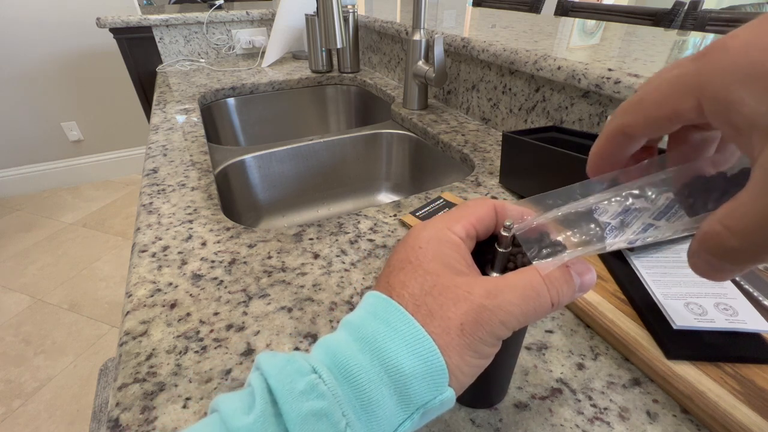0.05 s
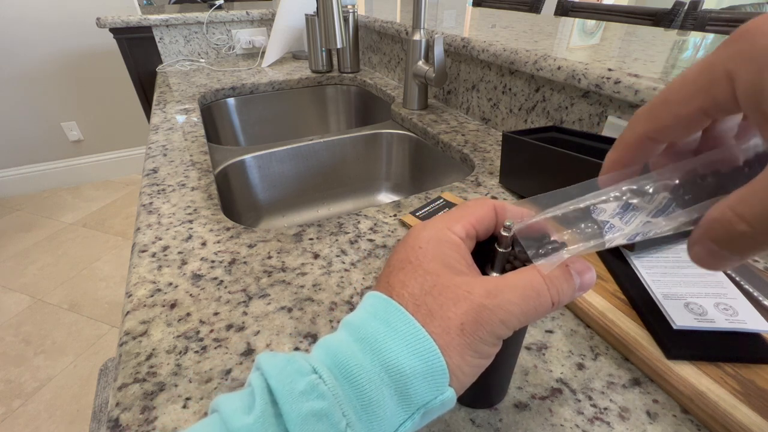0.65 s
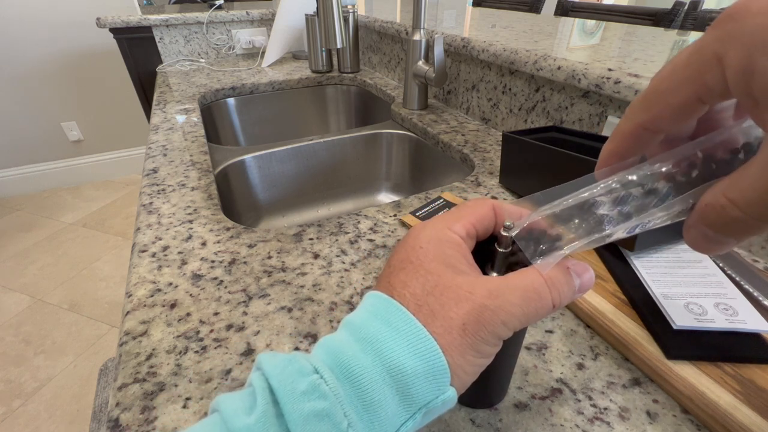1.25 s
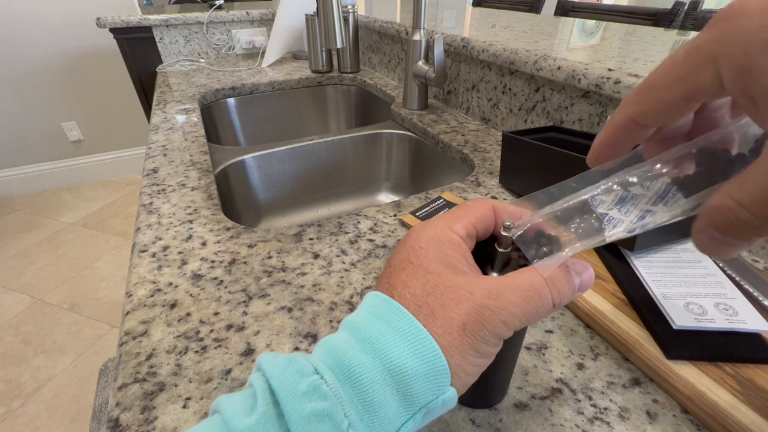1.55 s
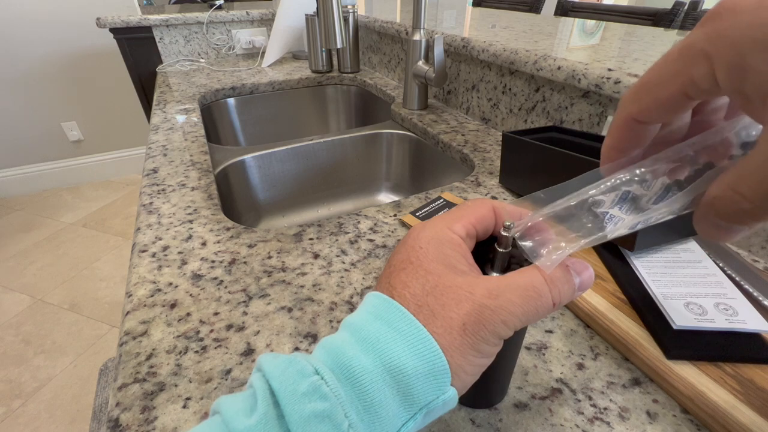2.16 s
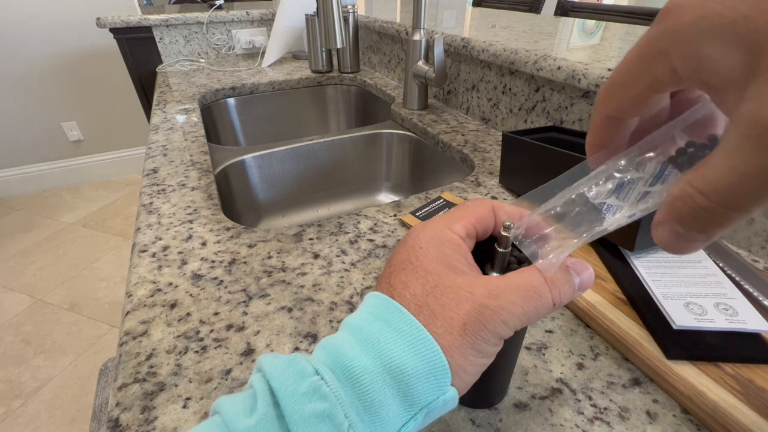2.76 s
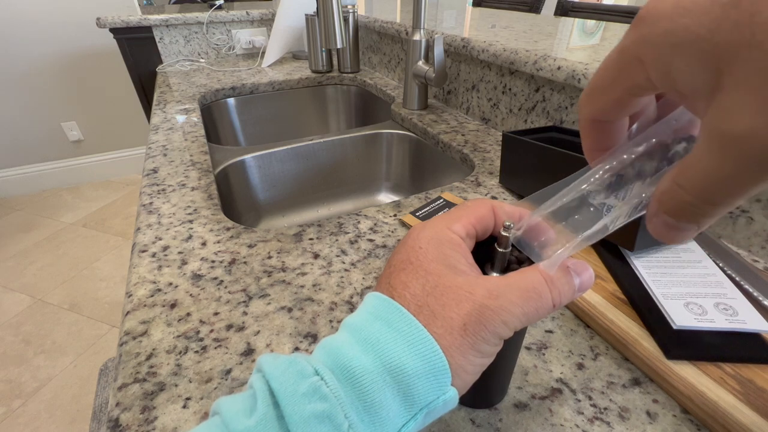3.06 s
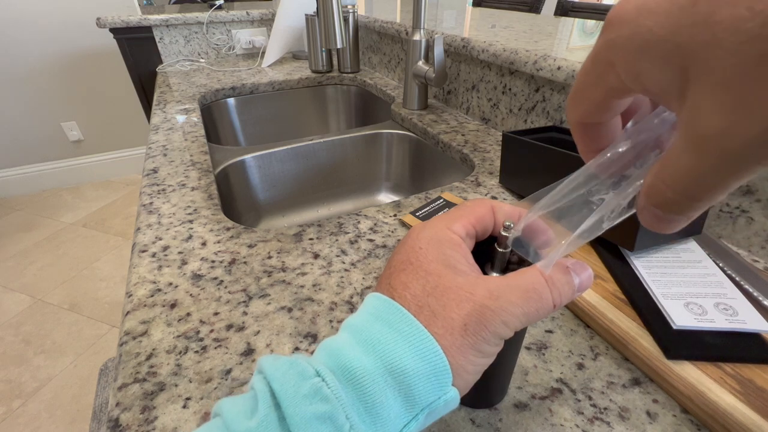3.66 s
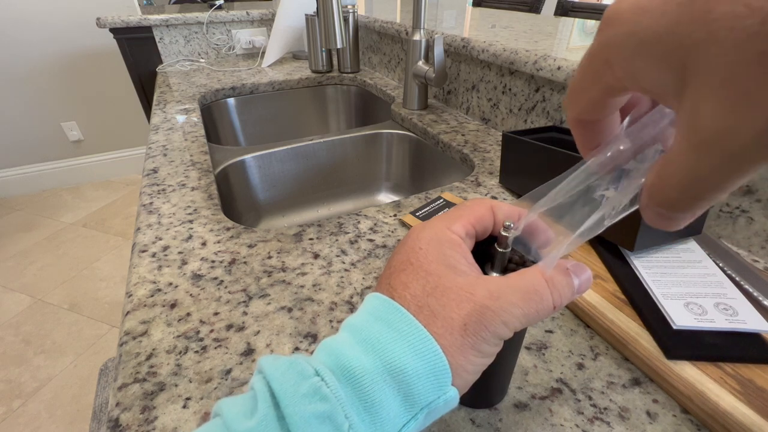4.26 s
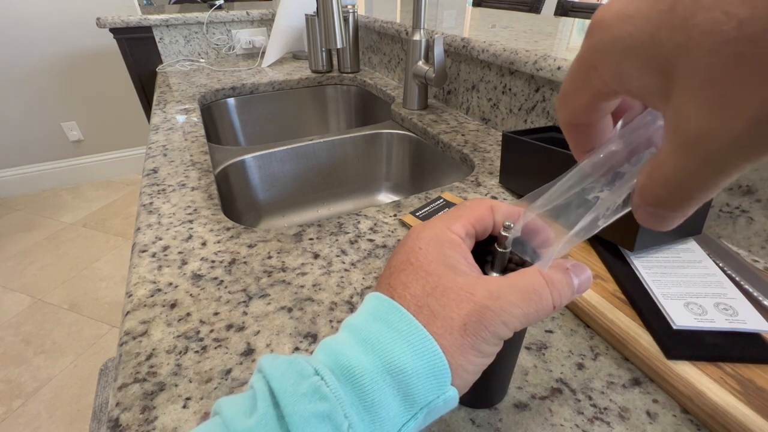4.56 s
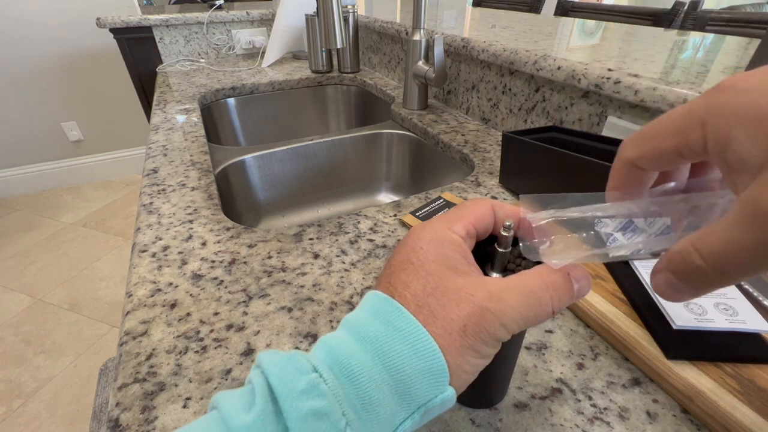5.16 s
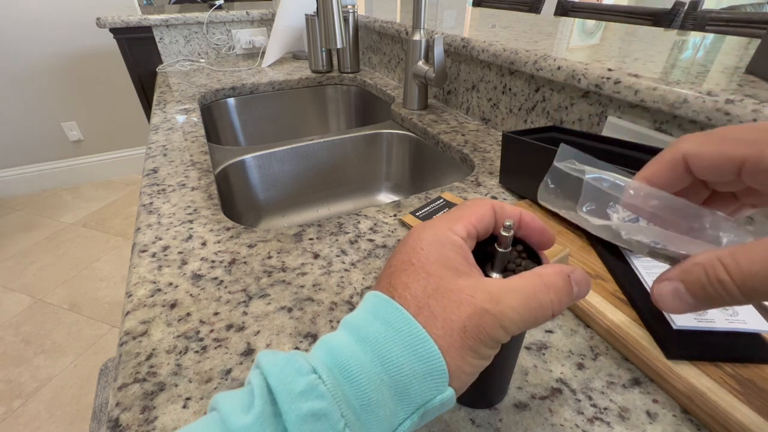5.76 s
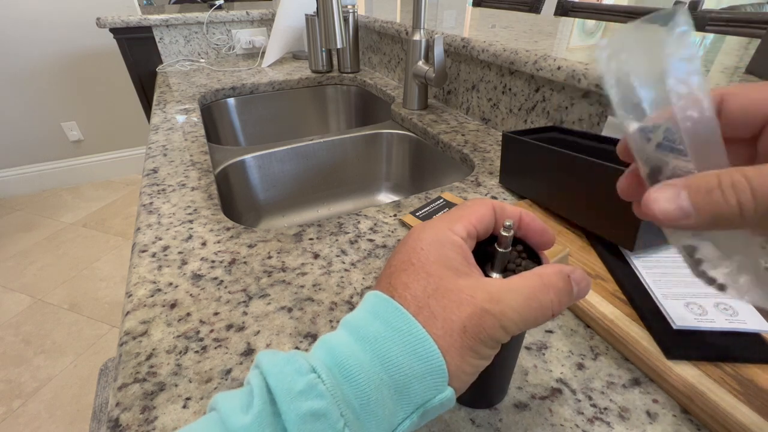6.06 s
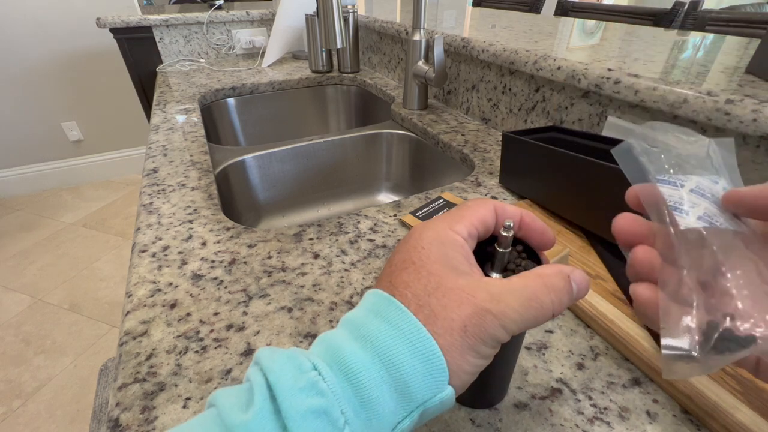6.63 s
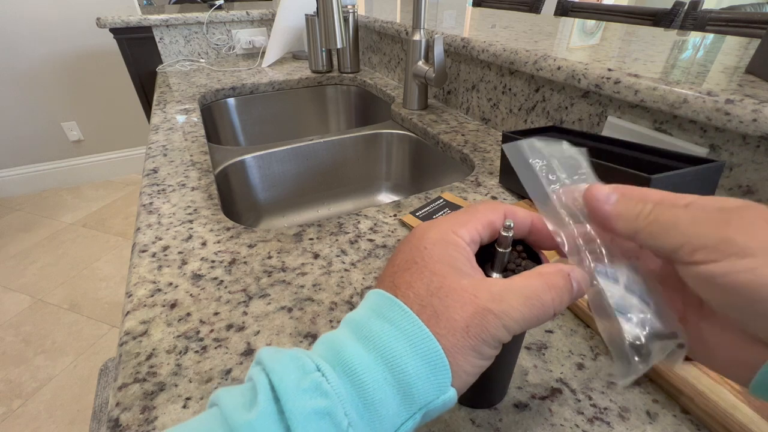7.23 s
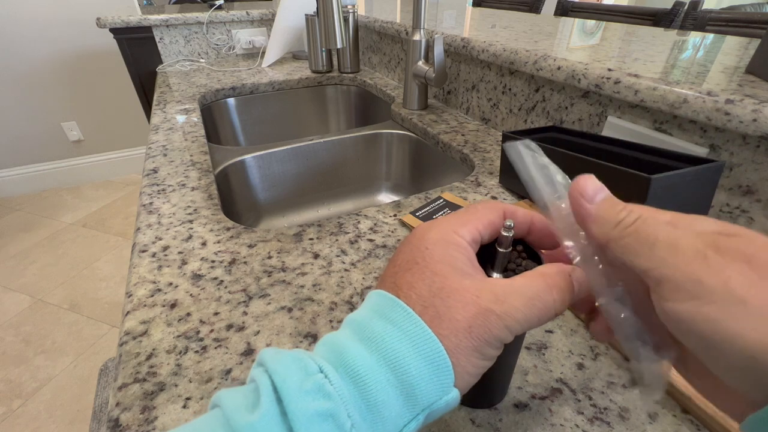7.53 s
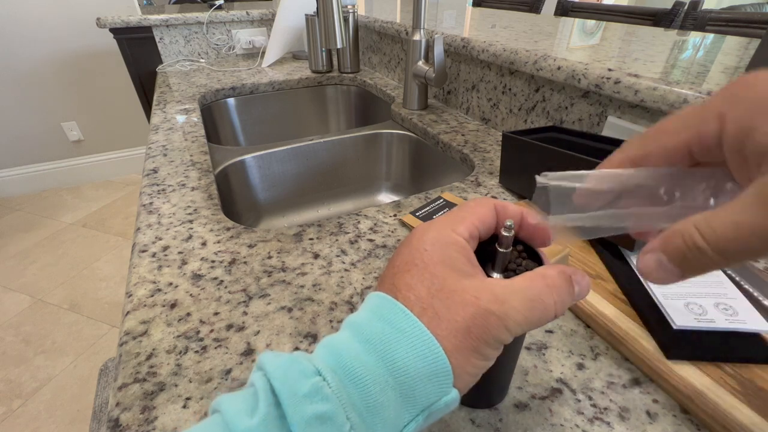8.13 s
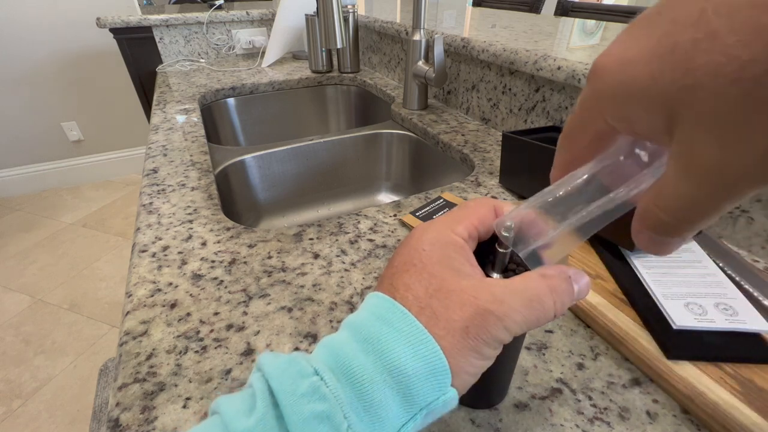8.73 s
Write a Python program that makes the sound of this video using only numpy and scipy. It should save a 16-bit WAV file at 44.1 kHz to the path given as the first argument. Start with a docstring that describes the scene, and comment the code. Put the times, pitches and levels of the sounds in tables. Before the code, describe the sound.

A thin plastic packet crinkles close by, with a sharp snap at about 0.3 seconds. From around 1 second, peppercorns slide out in small spurts, ticking against the plastic and landing in a metal grinder with a faint, low ring. Creases crack loudly near 1.8 seconds, and the shaking, trickling and crackling go on until about 5 seconds, with soft, dull bumps from the fingers. After a short lull, the packet is tipped back and the remaining corns rattle down inside it near 5.8 seconds with a hollow sound. From 6.3 to 7.7 seconds it is handled more busily, with snaps, rattles and small thumps. One more sharp crack and bump comes just after 8 seconds, followed by a short final pour around 8.5 seconds. The kitchen adds a soft echo over a very faint, low hush.

```python
"""A thin plastic packet crackles and snaps as fingers shake peppercorns out into a steel grinder.
The corns tick against the plastic as they slide and ring the grinder's cup as they land.
Creases flip with sharp cracks, and the hand adds dull bumps. The packet is tipped back, the last
corns rattle down inside its hollow, and it is poured again. A hard kitchen echoes softly."""
import sys
import numpy as np
from scipy import signal
from scipy.fft import rfft, irfft, next_fast_len
from scipy.io import wavfile
from scipy.ndimage import uniform_filter1d, map_coordinates

SR = 44100
rng = np.random.default_rng(int(sys.argv[2]) if len(sys.argv) > 2 else 0)


def generate_wav(signal):
    """Clip the signal to [-1, 1] and save it as 16-bit WAV at the path in sys.argv[1]."""
    frames = np.transpose(np.atleast_2d(signal))
    scaled = np.clip(frames, -1, 1) * 32767
    pcm = np.round(scaled).astype(np.int16)
    wavfile.write(sys.argv[1], SR, pcm)


N = 387638

# Tone colours: how strong each pitch is in a sound. Columns: pitch_hz, level_db
POURING_TONE = [(300, -40.5), (520, -22), (680, -4), (870, -0.5), (1080, 1), (1400, -6.5), (2200, -5),
                (3400, -16.5), (9500, -28), (12000, -20.5), (16000, -44)]  # corns running out
HOLLOW_TONE = [(700, -30), (1200, -9), (1400, -1.5), (1760, -1), (2000, -16), (2300, -11.5), (3200, -19.5),
               (6500, -27.5), (14000, -38)]  # corns falling back inside
PLASTIC_TONE = [(1500, 4.5), (4000, 4), (6500, 6), (12000, 0.5), (15500, -11.5)]  # plastic rustling and cracking
FLICK_TONE = [(2500, -26.5), (7000, 1), (9500, 4), (16000, -4.5)]  # a small crease flipping
BUMP_TONE = [(30, -51), (80, -2), (330, 2), (700, -3), (1200, -27)]  # the hand bumping the packet


def corns(rattle_db, landing_db, tilt):
    """Corns tick on the plastic, broad running out, hollow falling back; they ring the cup as they land."""
    full_flow_db, cup_db, clump_db = -43, -5, 4
    stream = np.minimum(amp(landing_db - full_flow_db), 1)
    ticks = patter(380, 5.5, .0005)
    rush = (.2 + .7 * stream ** 2) * stereo_noise(.6, N)  # in a full stream the ticks merge
    pouring = np.sqrt(tilt) * steady(coloured(ticks + rush, POURING_TONE), seconds=0.1)
    # the hollow's note rises as corns fill the closed end, and wavers as the walls flex
    fill = np.interp(np.arange(N) / SR, (5.77, 6.13), (0, 1))
    fill = np.clip(fill + 0.24 * wobble(12), 0, 1)
    tumble = lambda: patter(800, 5, .0005)
    empty = coloured(tumble(), [(hz * 0.967, db) for hz, db in HOLLOW_TONE])
    full = coloured(tumble(), [(hz * 1.016, db) for hz, db in HOLLOW_TONE])
    hollow = np.sqrt(1 - tilt) * steady(np.sqrt(1 - fill) * empty + np.sqrt(fill) * full, seconds=0.095)
    # The ring of the grinder's cup. Columns: pitch_hz, level_db
    cup_tone = [(190, -25), (370, 7), (510, -9), (900, -28.5)]
    cup = amp(full_flow_db + cup_db) * stream ** 2 * unit(coloured(tumble(), cup_tone))
    clumps = (1 - stream / 2) * wobble(28)  # corns jam and let go in small groups
    return amp(clump_db * clumps) * (amp(rattle_db) * (pouring + hollow) + cup)


def snaps(tilt, size=2048):
    """A big crease cracks and rings the plastic, a single corn knocks on it, a small crease only ticks."""
    # Big creases buckling. Columns: start_s, level_db, pitch_hz, crack_db (all levels are relative)
    buckles = [(0.221, -21, 1500, -33), (0.296, -11, 1524, -21), (0.529, -19, 1545, -28),
               (0.94, -39, 1240, -1), (1.232, -28.5, 1270, -5.5), (1.733, -17, 1415, -20),
               (1.788, -11, 1526, -10.5), (1.798, -16.5, 1310, -32), (2.531, -24.5, 1290, -31),
               (2.695, -24.5, 2160, -16), (2.964, -19, 1405, -29), (3.288, -24, 1940, -14.5),
               (3.519, -20, 2270, -25.5), (3.824, -21.5, 1980, -22.5), (3.849, -21, 1740, -17),
               (3.891, -20.5, 1240, -33), (4.031, -20.5, 1380, -10.5), (4.821, -28, 2180, -11.5),
               (4.901, -17.5, 1110, -28), (6.272, -21.5, 1573, -23), (6.352, -20.5, 1580, -23),
               (6.415, -14, 1490, -21), (6.575, -22.5, 1450, -18), (6.706, -20, 1600, -23.5),
               (6.841, -18.5, 1520, -14.5), (6.936, -22, 865, -18.5), (6.974, -21, 1890, -10),
               (7.019, -17, 1570, -30), (7.136, -13.5, 1490, -34), (7.242, -21.5, 1545, -16.5),
               (7.348, -14.5, 2076, -23), (7.846, -23, 1635, -20.5), (7.94, -28, 1506, -33),
               (8.064, -11, 1518, -14)]
    # Single corns hitting the tight packet. Columns: start_s, level_db
    taps = [(0.028, -23.5), (0.115, -27.5), (0.17, -27), (0.4, -27), (1.184, -19), (1.295, -22),
            (1.337, -22.5), (1.384, -24), (1.507, -22.5), (1.743, -16), (1.999, -24), (2.085, -29),
            (2.224, -27), (2.252, -25.5), (2.331, -34.5), (2.458, -28.5), (2.856, -22.5), (3.023, -27),
            (3.182, -20), (3.231, -25.5), (3.353, -36), (3.586, -28.5), (3.756, -27), (3.929, -20),
            (4.045, -23), (4.26, -31.5), (4.325, -30), (4.366, -24.5), (4.479, -42.5), (4.763, -37.5),
            (4.873, -26.5), (5.15, -42), (5.485, -41), (5.838, -27), (5.902, -23.5), (6.152, -22),
            (6.378, -18), (6.475, -20.5), (6.524, -18.5), (6.626, -28.5), (7.093, -18.5), (7.523, -23),
            (7.573, -28.5), (7.619, -24.5), (7.702, -25.5), (8.221, -34.5)]
    # Small creases flipping. Columns: start_s, level_db
    flicks = [(2.163, -27.5), (2.507, -28), (2.597, -24.5), (3.034, -30), (3.945, -28), (3.976, -33),
              (4.007, -23), (4.121, -25.5), (4.594, -42), (4.951, -27), (5.065, -34.5), (8.587, -29.5),
              (8.687, -29)]
    # The notes in a buckling patch of plastic. Columns: pitch_ratio, level_db
    notes = [(.71, -9), (1, 8), (1.44, -3), (3.2, -16.5)]
    lead = SR // 100  # samples of room for each sound to build up
    out = np.zeros((2, N + size))
    t = (np.arange(size) - lead) / SR - .001

    def burst(fade_s):
        """A puff of noise that rises fast, then drops 60 dB in fade_s."""
        return stereo_noise(.75, size) * amp(-60 * np.maximum(t / fade_s, -t / .003))

    def ring(hz):
        """The plastic's short hollow note, roughened with noise."""
        age = np.maximum(t, 0)
        waves = sum(amp(db + 2 * rng.standard_normal((2, 1))) * np.sin(2 * np.pi * hz * ratio * age)
                    for ratio, db in notes)
        noise = coloured(burst(0.011), [(hz / 5, -20), (hz / 2, -4), (hz * 1.5, -2), (hz * 8, -34)])
        return unit(unit(waves * amp(-60 * age / 0.037)) + unit(noise))

    def add(start_s, db, sound):
        """Place one sound in the mix."""
        out[:, round(start_s * SR) - lead:][:, :size] += amp(db - 22.5) * sound

    for start_s, db, hz, crack_db in buckles:
        cutoff_hz = 6500 * 2 ** (-(db + 11.5) / 10)  # bigger creases flip more slowly and sound duller
        crack = coloured(burst(.009), PLASTIC_TONE)
        crack = unit(coloured(crack, [(cutoff_hz, 0), (2 * cutoff_hz, -14)]))
        add(start_s, db, ring(hz) + amp(crack_db + 10.0) * crack)
        add(start_s + rng.uniform(0.00298, .012), db - 13, ring(hz))  # it settles with a smaller flip
    for start_s, db in taps:
        knock, down = burst(0.018), tilt[round(start_s * SR)]
        tap = down * coloured(knock, POURING_TONE) + (1 - down) * coloured(knock, HOLLOW_TONE)
        add(start_s, db, unit(tap))
    for start_s, db in flicks:
        add(start_s, db, unit(coloured(burst(0.013), FLICK_TONE)))
    return out[:, :N]


def crackle(flick_db, rustle_db):
    """Creases flip with thin, scattered ticks over a fine sliding rustle."""
    flicks = steady(coloured(patter(70, 5.4, .0006), FLICK_TONE), seconds=0.95)
    rustle = steady(coloured(patter(1500, 4, .0006), PLASTIC_TONE), seconds=0.094)
    return amp(flick_db - 1.5) * flicks + amp(rustle_db - 6.5) * rustle


def handling(tilt):
    """Slides and squeezes set how loud the rattle, crease flicks, bumps and landing corns are, in dB."""
    # Corns sliding along the packet. Columns: start_s, hold_s, level_db
    slides = [(1.08, 0.37, -42), (1.86, 0.25, -45), (2.3, 0.092, -48), (2.99, 0.4, -47.5),
              (3.21, 0.058, -46.5), (3.88, 0.032, -44.5), (5.83, 0.1, -42), (6.58, 0.24, -43.5),
              (8.3, 0.19, -43.5)]
    # Fingers jostling the corns. Columns: start_s, hold_s, level_db, bump_db (added to level_db)
    squeezes = [(0.0, 0.22, -49, -15), (0.257, 0.18, -53, -6.5), (0.535, 0.092, -56.5, -10),
                (1.72, 0.1, -49, -12), (1.967, 0.17, -47, -7), (2.214, 0.39, -50.5, -9),
                (2.684, 0.13, -48.5, -7), (3.165, 0.23, -51.5, -8), (3.518, 0.12, -59.5, 0.5),
                (3.69, 0.087, -49.5, -6), (3.917, 0.021, -41, -37), (4.123, 0.13, -58, -4),
                (4.339, 0.033, -53, 0.5), (4.474, 0.18, -59, -1), (4.875, 0.094, -50, -8),
                (6.128, 0.0048, -39, -46), (6.375, 0.11, -38, -12.5), (6.683, 0.24, -56, 1),
                (6.956, 0.068, -37, -11.5), (7.11, 0.011, -41, -5), (7.249, 0.055, -36, -7.5),
                (7.385, 0.12, -44.5, -9.5), (7.587, 0.0063, -44, 1), (7.821, 0.07, -52, -1.5),
                (8.445, 0.16, -50, 1.5)]
    trickle = (amp(-63) * tilt) ** 2  # stray corns creep while the mouth points down
    flow = swells(slides, rise_db_per_s=80.5, fall_db_per_s=72.5) + trickle
    speeds = dict(rise_db_per_s=488.5, fall_db_per_s=183)  # plastic gives at once, relaxes more slowly
    jostle = swells([row[:3] for row in squeezes], **speeds)
    bumps = swells([(start_s, hold_s, db + bump) for start_s, hold_s, db, bump in squeezes], **speeds)
    # sliding corns also flip creases and bump softly against the fingers
    flick_db = decibels(jostle + amp(-7) ** 2 * flow)
    bump_db = decibels(bumps + amp(-25.5) ** 2 * flow)
    return decibels(flow + jostle), flick_db, bump_db, decibels(flow * tilt ** 3)


def fingers(bump_db):
    """Fingertips bump and drag on the packet."""
    return amp(bump_db) * steady(coloured(patter(300, 4, .003), BUMP_TONE), seconds=0.041)


def thumps(size=4096):
    """The hand catches the bigger jolts with short, dull thumps."""
    # The packet hitting the hand. Columns: start_s, level_db (relative)
    jolts = [(0.303, -43.5), (1.786, -34), (2.854, -33), (6.414, -37.5), (6.705, -35), (6.935, -32.5),
             (7.017, -31.5), (7.24, -37), (7.348, -37), (7.576, -34), (8.065, -26.5)]
    out, t = np.zeros((2, N + size)), np.arange(size) / SR
    for start_s, db in jolts:
        push = coloured(stereo_noise(0.53, size) * amp(-60 * t / 0.061), BUMP_TONE)
        out[:, round(start_s * SR):][:, :size] += amp(db - 16.5) * unit(push)
    return out[:, :N]


def kitchen(x, counter_db, room_db, size=16384):
    """Counter and sink echo quickly, the room adds a soft tail; both shift randomly over time."""
    # How long the room's echo takes to drop 60 dB. Columns: pitch_hz, fade_s
    fades = [(150, 1), (1000, 0.63), (7000, 0.88), (15000, 0.012)]
    age = np.arange(size) / SR
    padded = np.pad(x, ((0, 0), (size // 2, 2 * size)))
    out = padded.copy()
    for start in range(0, N + size // 2, size // 2):  # each overlapping piece gets a new random echo
        hz, t, spectrum = signal.stft(rng.standard_normal((2, size)), SR, nperseg=256)
        tail = signal.istft(spectrum * amp(-60 * t / at_pitch(fades, hz)[:, None]), SR, nperseg=256)[1]
        early = rng.standard_normal((2, size)) * amp(-60 * age / .03)
        echo = (amp(room_db) * unit(tail) + amp(counter_db) * unit(early)) / np.sqrt(size)
        piece = padded[:, start:start + size] * np.hanning(size)
        out[:, start:start + 2 * size - 1] += signal.fftconvolve(piece, echo, axes=1)
    return out[:, size // 2:][:, :N]


def room_air():
    """The air in the room makes a faint, low hush."""
    # The tone of the hush. Columns: pitch_hz, level_db
    air_tone = [(25, -28.5), (120, 0), (200, -9.5), (2000, -24), (16000, -42)]
    return amp(-71.5) * unit(coloured(stereo_noise(1.0, N), air_tone))


def amp(db):
    """Turn decibels into a multiplier."""
    return 10 ** (np.asarray(db) / 20)


def decibels(power):
    """Turn power into decibels."""
    return 10 * np.log10(power + 1e-20)


def unit(x):
    """Scale a sound to an average power of 1."""
    return x / np.sqrt(np.mean(x ** 2) + 1e-20)


def steady(x, seconds):
    """Even out loudness changes slower than the given time."""
    power = uniform_filter1d(np.mean(x ** 2, axis=0), max(int(seconds * SR), 2))
    return x / np.sqrt(np.abs(power) + np.mean(x ** 2) / 100)


def at_pitch(points, hz):
    """Read between (pitch_hz, value) rows, with octaves evenly spaced."""
    pitches, values = np.transpose(points)
    return np.interp(np.log(hz + 1), np.log(pitches + 1), values)


def coloured(x, tone):
    """Filter a sound with a tone colour of (pitch_hz, level_db) rows."""
    n = x.shape[-1]
    size = 2 * next_fast_len(n // 2 + 1024)
    gain = amp(at_pitch(tone, np.fft.rfftfreq(size, 1 / SR)))
    shape = irfft(np.log(gain), size)
    shape[1:size // 2] *= 2  # fold it so the filter rings after a hit, never before
    shape[size // 2 + 1:] = 0
    return irfft(rfft(x, size) * np.exp(rfft(shape)), size)[..., :n]


def stereo_noise(alike, size):
    """Left and right hiss: unrelated when alike is 0, the same when it is 1."""
    mid, side = rng.standard_normal((2, size))
    turn = np.arccos(np.clip(alike, -1, 1)) / 2
    return np.cos(turn) * mid + np.sin(turn) * np.array([side, -side])


def patter(per_s, scatter_db, fade_s):
    """A shower of tiny dry ticks, each a puff of noise with its own strength."""
    hits = (rng.random(N) < per_s / SR) * amp(scatter_db * np.clip(rng.standard_normal(N), -2, 2))
    power = signal.lfilter([1], [1, -np.exp(-2 / (fade_s * SR))], hits ** 2)
    return unit(np.sqrt(power) * stereo_noise(0.45, N))


def wobble(per_s):
    """A smooth curve through per_s random points a second."""
    return map_coordinates(rng.standard_normal(N), [np.arange(N) * per_s / SR])


def swells(rows, rise_db_per_s, fall_db_per_s):
    """Total power of moves that reach their level at start_s, hold it and fade."""
    t, power = np.arange(N) / SR, np.zeros(N)
    for start_s, hold_s, db in rows:
        drop_db = np.maximum(rise_db_per_s * (start_s - t), fall_db_per_s * (t - start_s - hold_s))
        power += amp(db - np.clip(drop_db, 0, 120)) ** 2
    return power


def scene():
    """The packet over the grinder, in a quiet kitchen."""
    # How the packet is held. Columns: time_s, tilt (1 = mouth down, 0 = tipped back)
    poses = [(5.0, 0.85), (5.2, 0.019), (6.25, 0.0097), (6.9, 0.24), (7.6, 0.42), (8.25, 0.1), (8.5, 0.87)]
    tilt = np.interp(np.arange(N) / SR, *np.transpose(poses))
    rattle_db, flick_db, bump_db, landing_db = handling(tilt)
    plastic_db = -3 * tilt - 10.5 * (1 - tilt)  # less crackle when tipped back
    plastic = crackle(flick_db + plastic_db, rattle_db + plastic_db) + snaps(tilt)
    slack = coloured(plastic, [(7000, 2.0), (12000, -12.0)])  # tipped back, it hangs loose and duller
    packet = tilt * plastic + (1 - tilt) * slack + corns(rattle_db, landing_db, tilt)
    packet += fingers(bump_db) + thumps()
    return room_air() + kitchen(packet, counter_db=-10, room_db=-13.5)


def record(dry, top_hz=16200):
    """Left and right each get their own tone colour and delay; everything above top_hz is cut."""
    # The two microphone openings. Columns: pitch_hz, left_minus_right_db, left_lead_radians
    openings = np.array([(133.4, -1, 1.44), (335, 5, -0.72), (1500, -6, -1.54), (3260, 0, 1.5),
                         (6420, 6.5, -1), (10150, -3.5, -9.5), (13530, 2.5, -14), (12800, 0, -29.5),
                         (16070, -1.5, -16)])
    size = next_fast_len(N + SR // 2)
    hz = np.fft.rfftfreq(size, 1 / SR)
    balance_db, lead = at_pitch(openings[:, :2], hz), at_pitch(openings[:, ::2], hz)
    left = amp(balance_db / 2) * np.exp(.5j * lead)
    return irfft(rfft(dry, size) * [left, 1 / left] * (hz < top_hz), size)[:, :N]


dry = scene()
out = record(dry)
generate_wav(out)
```